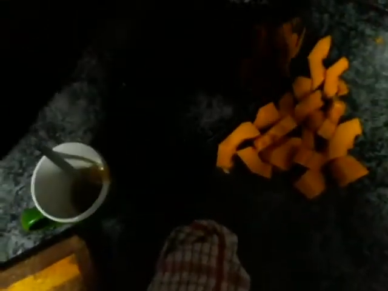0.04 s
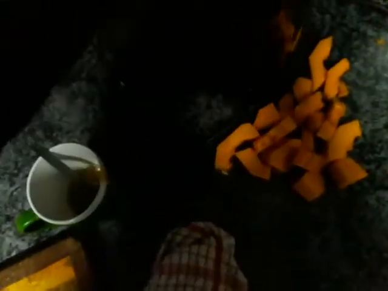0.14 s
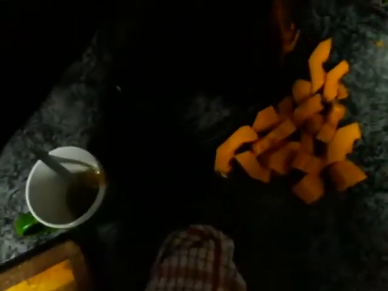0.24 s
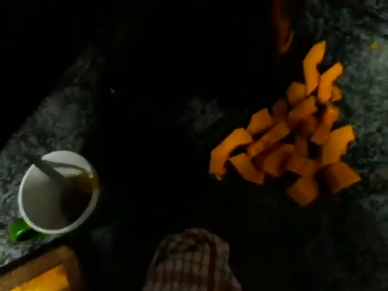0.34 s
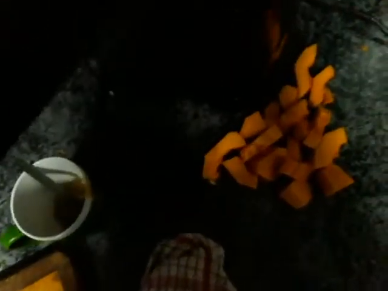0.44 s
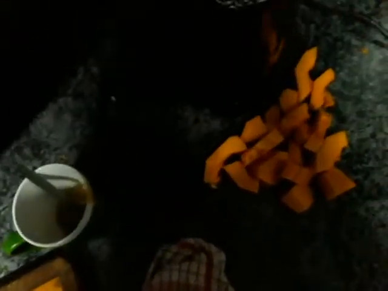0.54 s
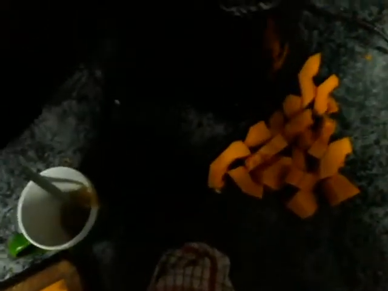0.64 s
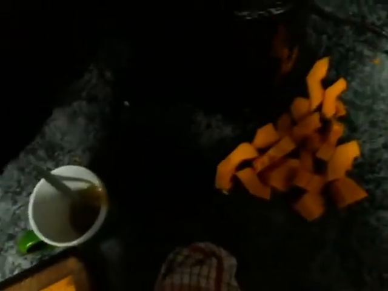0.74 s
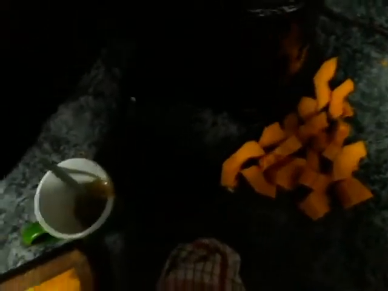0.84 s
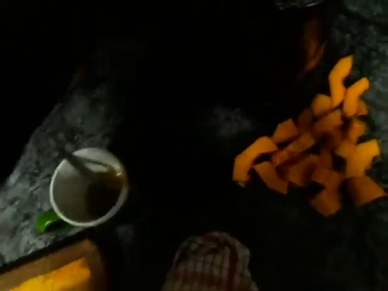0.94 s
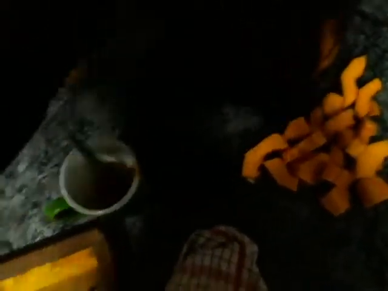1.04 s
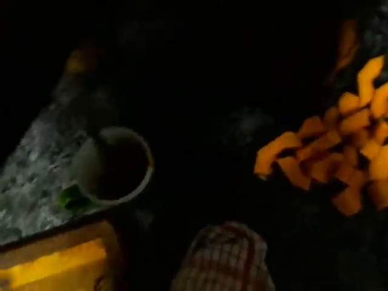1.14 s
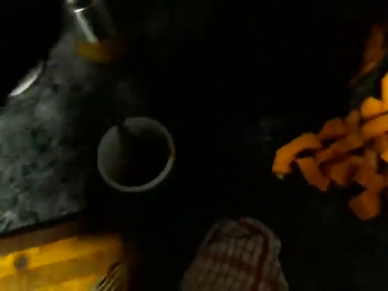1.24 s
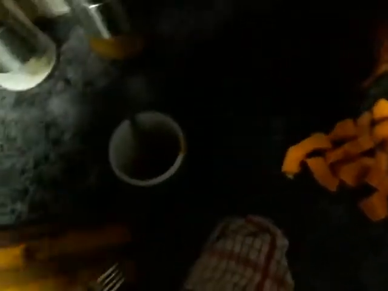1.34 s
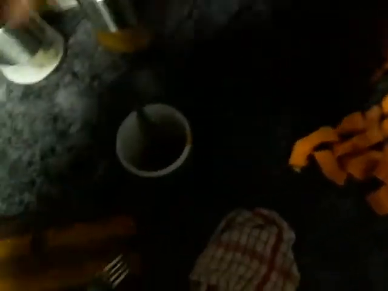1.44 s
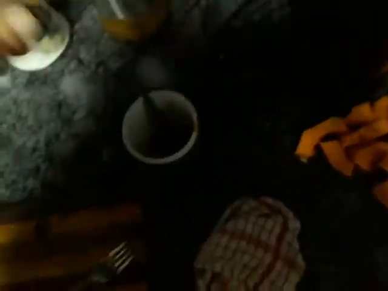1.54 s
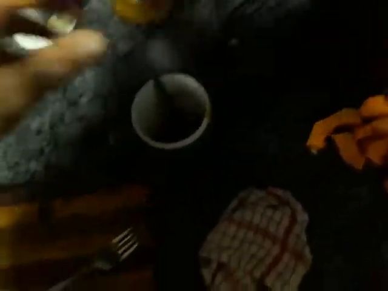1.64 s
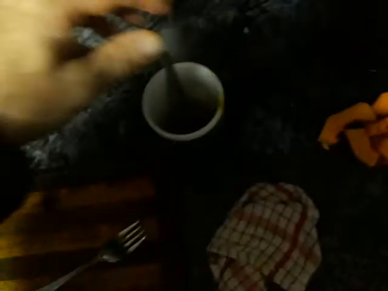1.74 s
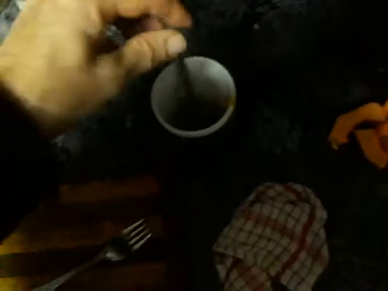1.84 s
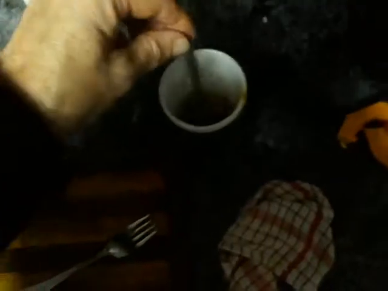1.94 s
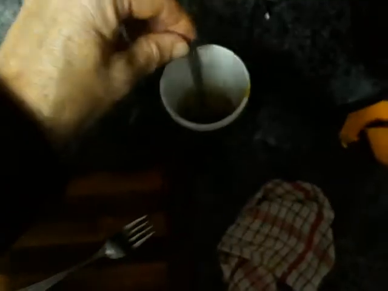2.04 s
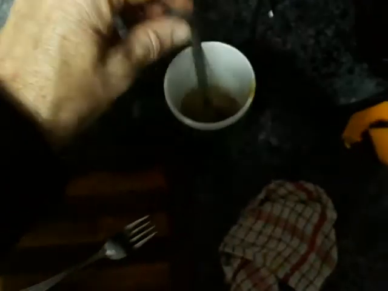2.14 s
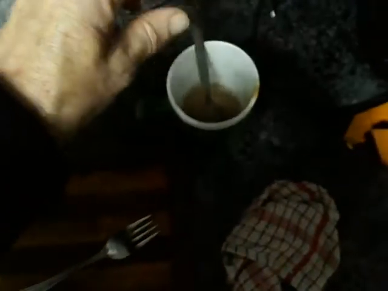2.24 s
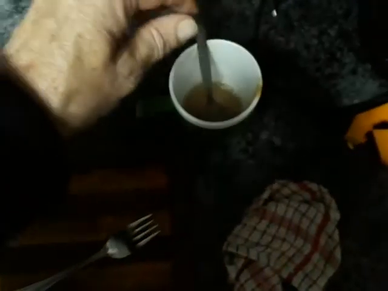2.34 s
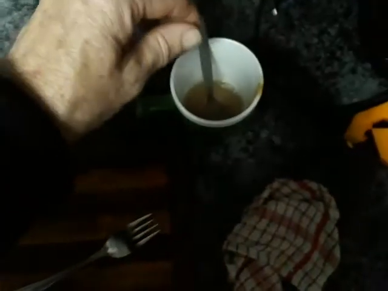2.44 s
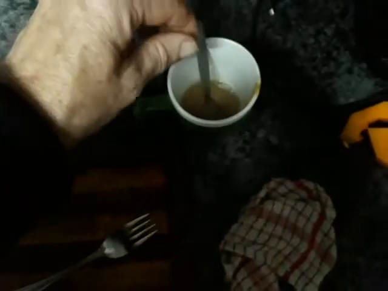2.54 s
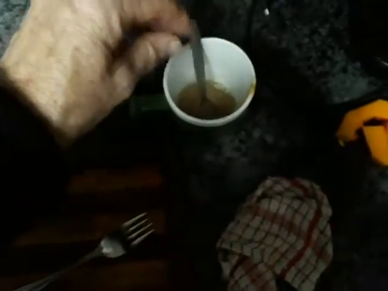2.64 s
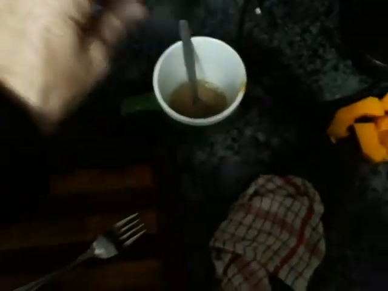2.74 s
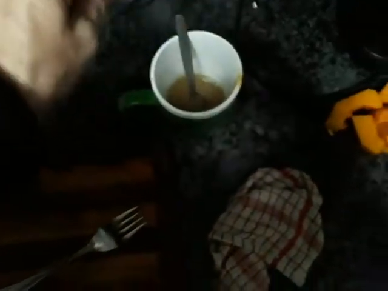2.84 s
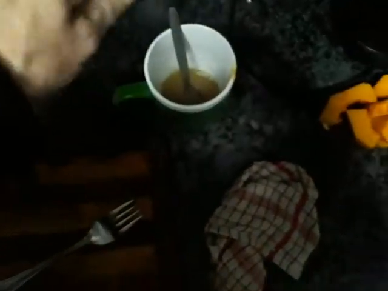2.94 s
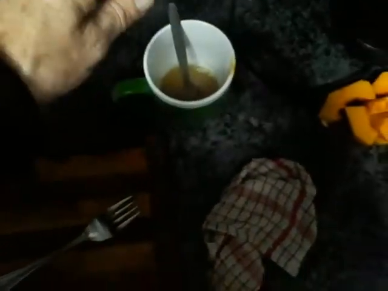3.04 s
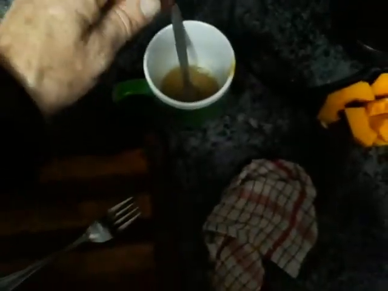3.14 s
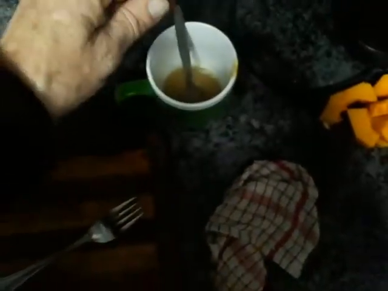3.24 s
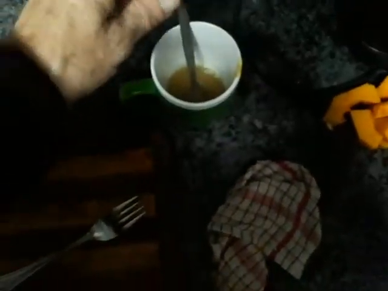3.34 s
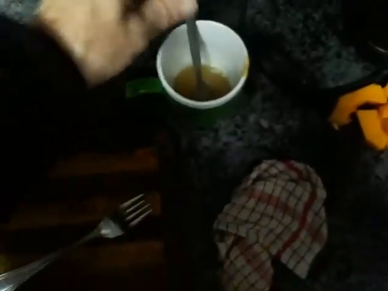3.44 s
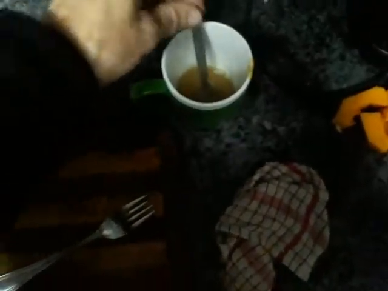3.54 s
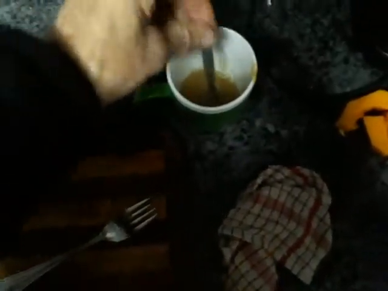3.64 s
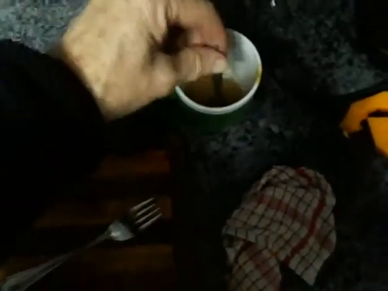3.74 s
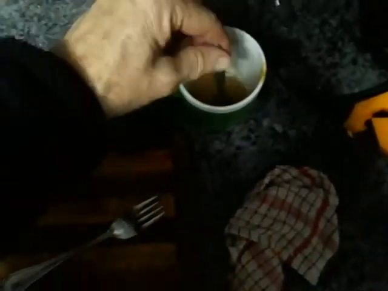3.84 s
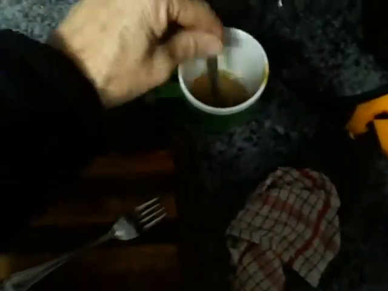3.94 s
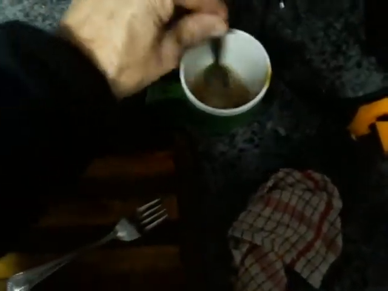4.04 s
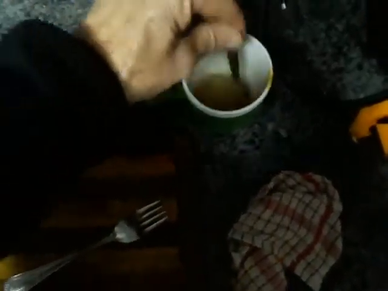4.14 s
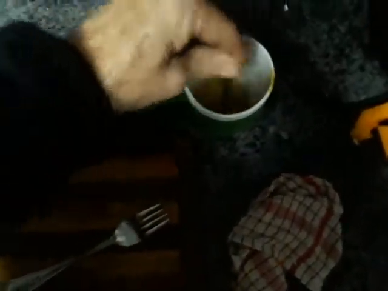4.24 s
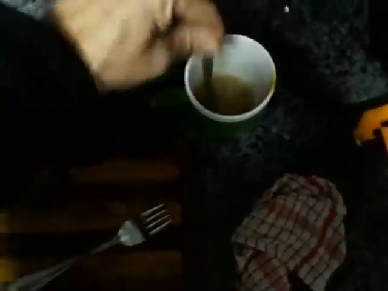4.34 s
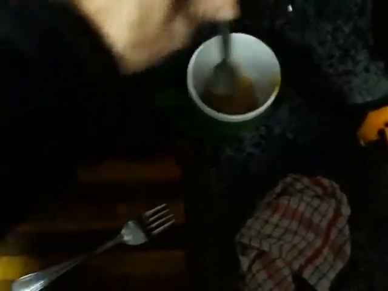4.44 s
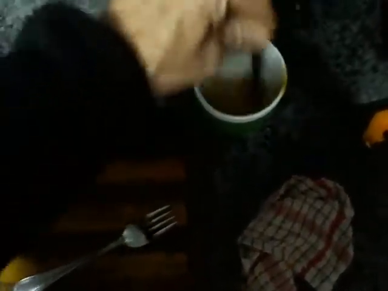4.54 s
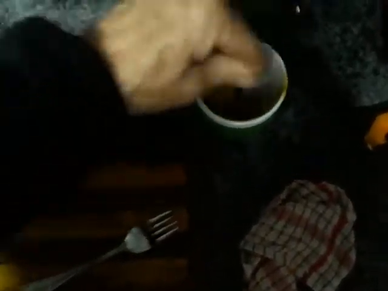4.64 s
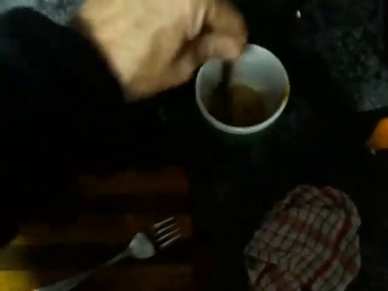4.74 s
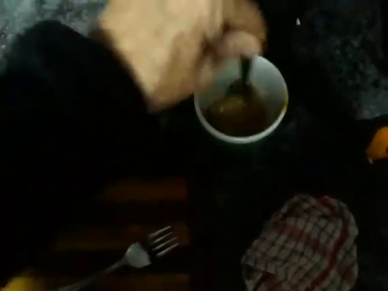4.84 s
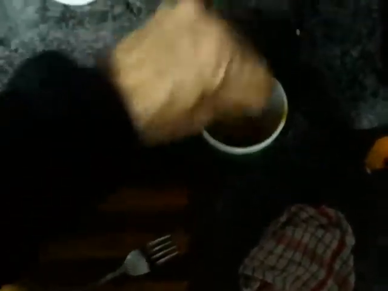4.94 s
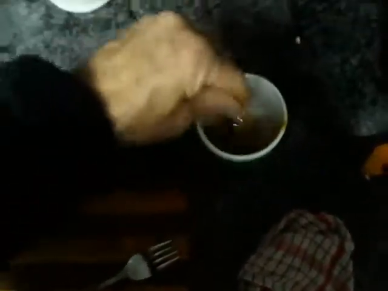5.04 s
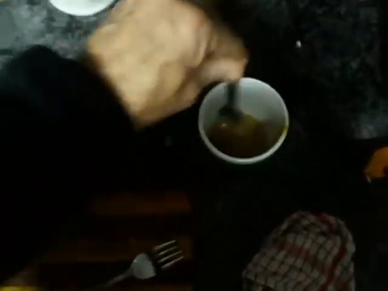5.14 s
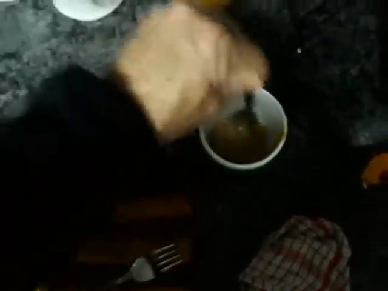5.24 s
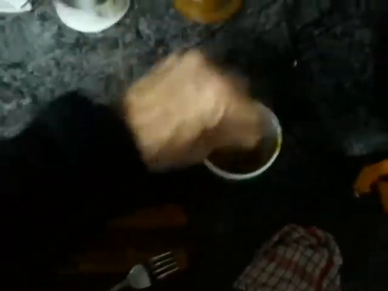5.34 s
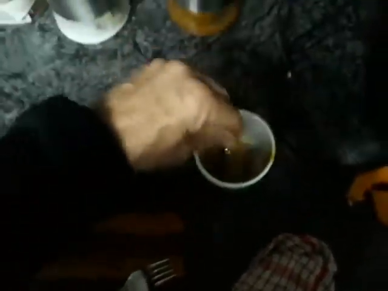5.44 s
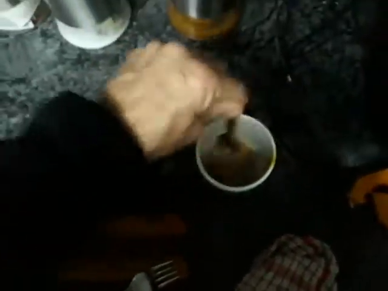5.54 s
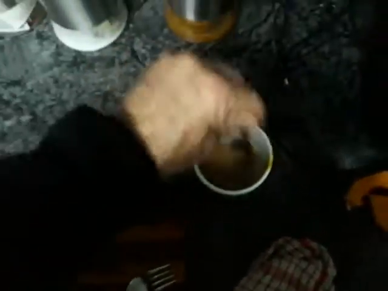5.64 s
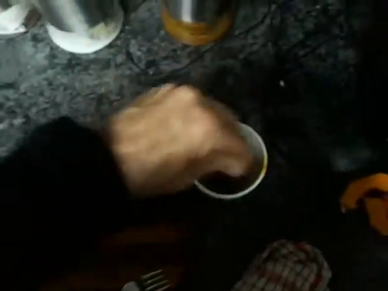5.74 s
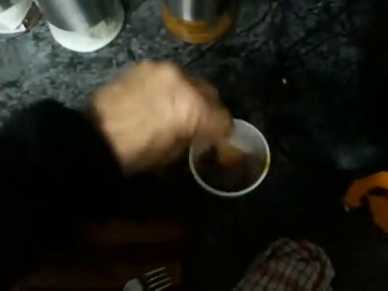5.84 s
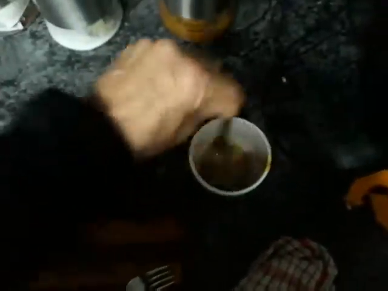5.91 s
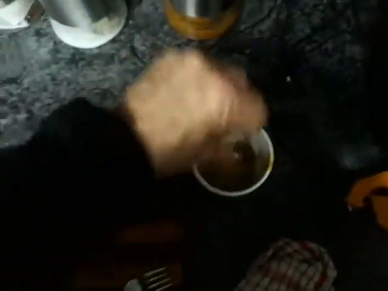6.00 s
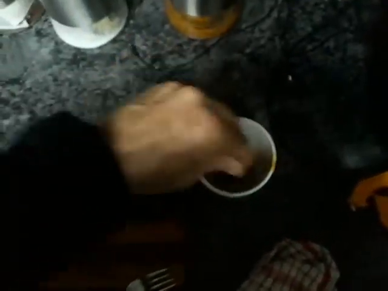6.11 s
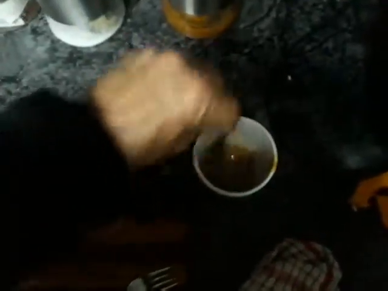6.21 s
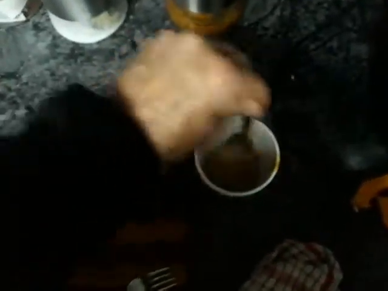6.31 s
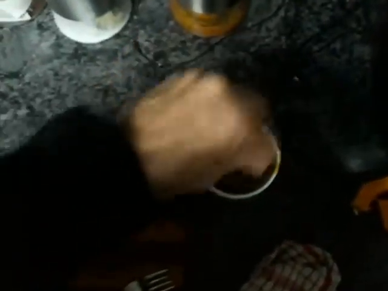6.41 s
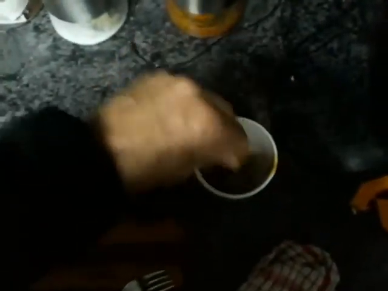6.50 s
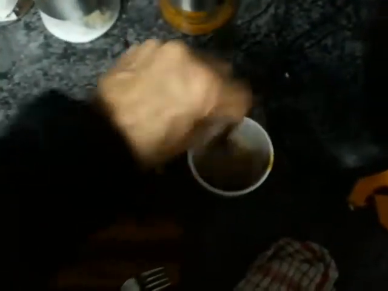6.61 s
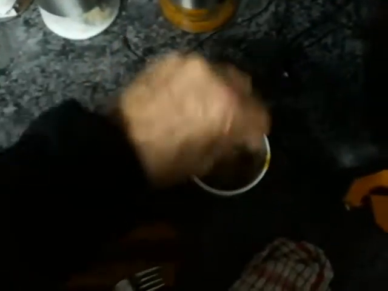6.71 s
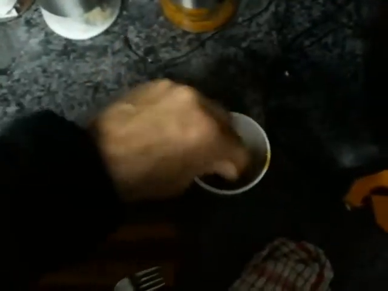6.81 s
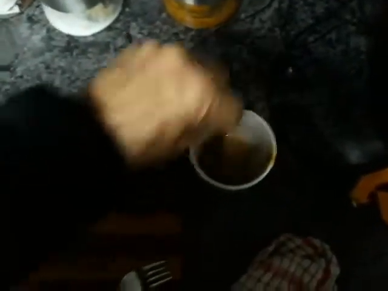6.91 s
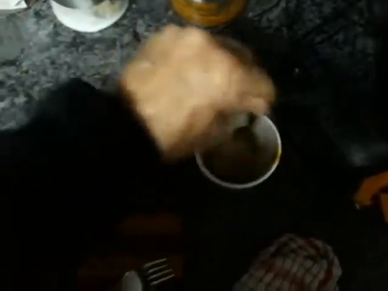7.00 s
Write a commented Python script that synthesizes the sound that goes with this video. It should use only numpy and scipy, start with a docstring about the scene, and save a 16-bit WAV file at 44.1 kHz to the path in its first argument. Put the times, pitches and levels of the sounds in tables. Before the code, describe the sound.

A close kitchen counter with a steady faint appliance hum and soft, slightly fluttering hiss. From 0 to 0.35 seconds, uneven wooden knocks and bumps, with a sharp catch snap at about 0.32; at 0.4 a loud, hollow cupboard or drawer slam, low thud and hard clack together, shudders in a fast weakening rattle and dies by about 0.9. Then near quiet, with barely audible sleeve rustles until 3.3, when a steel teaspoon falls against a ceramic mug: a quick bright clatter with short ringing, gone by 3.6. From about 4.2 to 7 seconds the spoon stirs briskly, one turn roughly every 0.38 seconds. Each turn has a gritty metallic scrape on the bottom, thin wall glides and irregular bright clinks; faint liquid swirling, occasional rising bubble blips and dull mug-foot bumps lie beneath. Short small-room reflections; stirring continues to the end.

```python
"""Kitchen counter, heard close: something wooden, likely a cupboard or drawer, knocks and bangs shut.
A steel teaspoon is let go in a ceramic mug, then stirs a drink: each turn clinks and scrapes.
An appliance hums under soft room hiss; a sleeve rustles faintly.
Blows are coloured noise bursts plus decaying modes; friction is random clicks through resonances.
Hum is wavering sines; hiss is noise fluttering in time-frequency patches."""
import sys
import numpy as np
from scipy import signal
from scipy.fft import rfft, irfft
from scipy.io import wavfile
from scipy.ndimage import uniform_filter1d, map_coordinates

SR = 44100
rng = np.random.default_rng(int(sys.argv[2]) if len(sys.argv) > 2 else 0)


def put_to_file(sound):
    """Save the sound as 16-bit audio at rate SR, in the file named by the first command-line argument."""
    columns = np.atleast_2d(sound).T  # one column per channel
    safe = np.clip(columns, -1, 1)
    whole_steps = np.round(safe * 32767)
    wavfile.write(sys.argv[1], SR, whole_steps.astype(np.int16))


N = 311610
RING_T_S = np.arange(SR * 3 // 4) / SR  # time axis of one ring
REFERENCE_DB = -20  # reference blow and tick
GRIP_S = 4.15  # fingers hold the spoon from here


def amp(db):
    """Decibels to gain."""
    return 10 ** (np.asarray(db) / 20)


def unit(x):
    """Scales to rms 1."""
    return x / np.sqrt(np.mean(x ** 2) + 1e-20)


def read(points, hz):
    """Joins (Hz, value) points on a log-frequency axis."""
    f, value = np.transpose(points)
    return np.interp(np.log(hz + 1), np.log(f), value)


def add(mix, s, sound):
    """Mixes a sound in at time s."""
    part = mix[max(round(s * SR), 0):][:len(sound)]
    part += sound[:len(part)]


def colour(x, points, tilt_db_per_oct=0):
    """Gives x a spectrum, tilted about 2 kHz (tilt flat below 200 Hz); rms 1."""
    hz = np.fft.rfftfreq(len(x), 1 / SR)
    octaves = np.log2(np.maximum(hz, 200) / 2000)
    gain = amp(read(points, hz) + tilt_db_per_oct * octaves)
    return unit(irfft(rfft(x) * gain, len(x)))


def resonate(x, hz, width_hz):
    """Steep-skirted resonance: one peak filter of this width, run twice; rms 1."""
    b, a = signal.iirpeak(min(hz, SR / 2 - 1), hz / width_hz, SR)
    once = signal.lfilter(b, a, x)
    return unit(signal.lfilter(b, a, once))


def highpass(x, hz):
    """Attenuates what lies below hz."""
    return signal.sosfilt(signal.butter(3, hz, "high", fs=SR, output="sos"), x)


def bend(x, speed):
    """Moves every resonance of x by the factor speed, moment by moment."""
    return map_coordinates(x, [np.cumsum(speed)], mode="wrap")


def dying(t60_s):
    """Envelope of a free decay."""
    return amp(-60 * RING_T_S / t60_s)


def mode(hz, db, t60_s):
    """One struck mode: a decaying sine."""
    return amp(db) * dying(t60_s) * np.sin(2 * np.pi * hz * RING_T_S)


def burst(x, t60_s, rise_s=0.00055):
    """Dense vibration builds up over the contact, then dies away from rms 1."""
    fade = dying(t60_s) * (1 - np.exp(-RING_T_S / rise_s))
    return x * fade / np.sqrt(np.sum((x * fade) ** 2) / np.sum(fade ** 2))


def noise():
    """White noise as long as one ring."""
    return rng.standard_normal(len(RING_T_S))


def slips(per_s, spread_db):
    """Stick and slip: tiny clicks at random times, of uneven size and either sign."""
    hits = rng.random(N) < per_s / SR
    return hits * amp(spread_db * rng.standard_normal(N)) * rng.choice([-1, 1], N)


# appliance hum lines: f/Hz, level/dB, wavering share
HUM_LINES = [(101.3, -58.5, 0.12), (150.7, -58, .35), (194, -64.5, 0.97), (343.3, -55.5, 0.55),
             (552, -59.5, 1.7)]
# room hiss spectrum: f/Hz, relative density/dB per Hz
HISS_SPECTRUM = [(20, -37), (45, -15), (72, -17), (95, -5.5), (160, -4.5), (215, -16), (335, 0),
                 (400, -6.5), (700, -8), (2300, -7.5), (3200, -17.5), (6200, -17), (10000, -42.5),
                 (16000, -33)]


def background(flutter_db=2.5, hum_width_hz=14, hiss_db=-47.5):
    """Hum lines wander as narrow noise joins each sine; hiss flutters in smoothed STFT patches."""
    t = np.arange(N) / SR
    hum = np.zeros(N)
    for hz, db, waver in HUM_LINES:
        wander = waver * resonate(rng.standard_normal(N), hz, hum_width_hz)
        hum += amp(db) * unit(np.sin(2 * np.pi * hz * t) + wander)
    z = signal.stft(rng.standard_normal(N), nperseg=256)[2]
    patch = np.outer(np.hanning(50), np.hanning(9))
    patches = unit(signal.fftconvolve(rng.standard_normal(z.shape), patch, "same"))
    hiss = signal.istft(z * amp(flutter_db * patches), nperseg=256)[1][:N]
    return hum + amp(hiss_db) * colour(hiss, HISS_SPECTRUM)


RATTLE_FROM_S, RATTLE_GAP_S, RATTLE_JITTER_S = 0.422, 0.014, 0.002
RATTLE_CLACK_DB, RATTLE_BODY_DB, RATTLE_FADE_DB_PER_S = -20, -16, 81


def rattle(count=6, bright_db_per_oct=1.5):
    """Quick, weakening knocks as the door shudders in its frame after the slam."""
    after = np.arange(count) * RATTLE_GAP_S + RATTLE_JITTER_S * rng.standard_normal(count)
    knocks = []
    for t in after:
        fade_db = RATTLE_FADE_DB_PER_S * t
        knocks.append((RATTLE_FROM_S + t, RATTLE_CLACK_DB - fade_db, RATTLE_BODY_DB - fade_db,
                       bright_db_per_oct))
    return knocks


# wooden knocks: t/s, clack level/dB, body level/dB, clack brightness/dB per octave
WOOD_KNOCKS = [(.015, -22, -17, -2), (.07, -39, -31, -2), (0.126, -30.5, -28, -2.5),
               (0.1857, -22, -22.5, -7), (0.2009, -36.5, -47, -1), (.246, -31.5, -30.5, -3),
               (0.322, -25, -33.5, 4), (0.366, -27.5, -21.5, -3), (0.3812, -18, -13.5, 2.5),
               (.3989, -9.5, -14, -3), (0.4073, -11.5, -12.5, 1.5), (.413, -15, -13.5, 1.5),
               (0.479, -18, -18, -4.5)]
# slam shakes the whole cabinet: t/s, level/dB
CABINET_SLAMS = [(0.403, -18.5), (0.479, -35)]
# catch snaps: t/s, level/dB
CATCH_SNAPS = [(0.3216, -3)]
# spectra of contact, boards, slam and catch: f/Hz, relative density/dB per Hz
CLACK_SPECTRUM = [(200, -35), (600, -27), (1200, -1), (1750, 0.5), (2400, 6.5), (3300, -8), (5000, -8),
                  (7000, -16.5), (9500, -40), (15000, -34)]
BOARD_SPECTRUM = [(40, -55), (80, -33), (120, -21), (200, -14), (270, 8.5), (330, 2.5), (410, -2),
                  (520, -12), (900, -10.5), (3000, -55)]
THUD_SPECTRUM = [(25, -25), (45, -25), (65, -2), (85, -10), (112, 7), (160, 11), (220, -22), (800, -57)]
SNAP_SPECTRUM = [(200, -18), (700, -11), (1200, -7), (2000, -2), (2550, 7), (3300, -4), (4300, -8),
                 (5300, -4), (7200, -8), (9500, -24), (15000, -22)]
# hollow of the cabinet, modes: f/Hz, level/dB before hollow_db, t60/s
CABINET_MODES = [(115.7, -12, 0.4), (160.6, -4, 0.19), (273, -29, 0.11), (411, -10.5, 0.2)]


def cupboard(clack_t60_s=0.095, board_t60_s=0.12, snap_t60_s=0.0076, hollow_db=-3, thud_t60_s=0.25,
             boards_lowest_hz=105):
    """Wooden blows: contact clack, thud of the boards, boom of the hollow behind them."""
    out = np.zeros(N)
    hollow = amp(hollow_db) * sum(mode(*row) for row in CABINET_MODES)
    body_swell = 1 - dying(0.034)
    for s, clack_db, body_db, bright in WOOD_KNOCKS + rattle():
        clack = burst(colour(noise(), CLACK_SPECTRUM, bright), clack_t60_s, rise_s=0.00013)
        body = burst(colour(noise(), BOARD_SPECTRUM), board_t60_s) + hollow
        add(out, s, amp(clack_db) * clack + amp(body_db) * body * body_swell)
    out = highpass(out, boards_lowest_hz)  # only the slam moves the whole cabinet
    for s, db in CABINET_SLAMS:
        add(out, s, amp(db) * burst(colour(noise(), THUD_SPECTRUM), thud_t60_s, rise_s=0.01))
    for s, db in CATCH_SNAPS:
        add(out, s, amp(db) * burst(colour(noise(), SNAP_SPECTRUM), snap_t60_s))
    return out


# sleeve rustles: t/s, level/dB, f/Hz
SLEEVE_RUSTLES = [(.07, -43.5, 4270), (.293, -50, 2300), (.835, -52.5, 5600), (1.15, -53, 1490),
                  (1.63, -47.5, 2180), (1.89, -51, 4740), (2.04, -50, 2210), (3.1, -49.5, 1680),
                  (4.063, -52.5, 2190)]


def sleeve(width_hz=2200, half_s=0.053):
    """Cloth brushes softly as the arm moves: random clicks through broad resonances."""
    t, drive = np.arange(N) / SR, slips(per_s=3200, spread_db=6.0)
    out = np.zeros(N)
    for s, db, hz in SLEEVE_RUSTLES:
        stroke = np.exp(-((t - s) / half_s) ** 2)
        out += amp(db) * stroke * resonate(drive, hz, width_hz)
    return out


MIDDLE_DB, MIDDLE_DB_PER_DB = -20, 0.92  # at the reference blow; slope with blow
MIDDLE_APART_DB_PER_OCT, MIDDLE_HZ = 20.5, 4970  # loss as spoon pitch leaves MIDDLE_HZ
TOP_DB, TOP_DB_PER_DB = -31, 2.1  # at the reference tick; slope with tick


def family_levels(blow_db, tick_db, hz, main_db, twin_db, high_db):
    """Mug mode-family levels/dB: contact point sets three, blow (with pitch) and tick the others."""
    apart_octaves = abs(np.log2(hz / MIDDLE_HZ))
    middle_db = MIDDLE_DB + MIDDLE_DB_PER_DB * (blow_db - REFERENCE_DB)
    middle_db -= MIDDLE_APART_DB_PER_OCT * apart_octaves
    top_db = TOP_DB + TOP_DB_PER_DB * (tick_db - REFERENCE_DB)
    return main_db + twin_db, main_db, middle_db, main_db + high_db, top_db


# spoon hits the wall: t/s, blow level/dB and tick level/dB before common gains, spoon f/Hz,
# mug main ring level/dB, lower twin re main/dB, high ring re main/dB
WALL_HITS = [(3.2943, -15, -23.5, 3780, -30.5, 6.5, 9.5), (3.307, -16, -44, 2710, -31, 13.5, -15),
             (3.3155, -17, -33, 2660, -34, -9, 13), (3.3663, -31, -46, 2660, -42.5, 14.5, 8.5),
             (3.433, -38.5, -58, 2980, -66, -14, 0), (3.464, -38.5, -48, 2930, -60, 0, 0),
             (3.5345, -40.5, -60, 2690, -69.5, 0, 21), (4.113, -34.5, -47, 3140, -66, -2, 0),
             (4.2314, -18.5, -16.5, 2980, -16, -25, 0), (4.4093, -16.5, -19.5, 5110, -22, -3.5, -7),
             (4.4522, -17.5, -19, 5040, -23.5, -3.5, -29), (4.533, -14.5, -26, 4580, -27, 7, 7.5),
             (4.5944, -30.5, -27.5, 4680, -28.5, 4.5, -11), (4.618, -39, -30.5, 5340, -27.5, -24, -14),
             (4.6832, -39, -34, 2940, -40, -19, -24), (4.787, -29.5, -27, 3900, -32.5, -1.5, 1),
             (4.998, -12.5, -25, 4170, -23, -4.5, 1.5), (5.006, -22, -23.5, 4930, -16, -37, -35),
             (5.1553, -17, -23.5, 5340, -27, -4, -3), (5.219, -29, -25, 4570, -32.5, -14, -18),
             (5.2665, -18, -26, 3240, -30.5, 4, 4.5), (5.3512, -26.5, -27, 3150, -31.5, 3.5, 2),
             (5.377, -18.5, -28.5, 2770, -44, -1, -7), (5.55, -31.5, -32.5, 5130, -42, -5, 3),
             (5.701, -33, -35, 4700, -24, -10, -3.5), (5.9162, -34, -30, 4570, -34.5, -9, -3),
             (6.0463, -28.5, -30.5, 4450, -24, -9.5, 3.5), (6.1149, -32, -38, 4600, -30.5, -10, -8),
             (6.1551, -17, -29, 2530, -40.5, -22, 15), (6.2627, -23.5, -22.5, 4920, -32.5, -6, 3.5),
             (6.402, -36, -30.5, 3300, -25, -8, -3.5), (6.506, -39, -29, 2870, -31.5, -20, -30),
             (6.6303, -46, -30, 4150, -37, -10, -4), (6.7232, -27, -34, 2020, -31.5, 5, -2.5),
             (6.969, -24.5, -23, 2950, -21, -16.5, -11)]
# mug modes, bell modes split into twins by the handle: family, f/Hz, level in family/dB,
# t60/s (clinks scale it)
MUG_MODES = [(0, 2067, 0, .24), (1, 2229, 1, .27), (1, 2256, -12, .16), (2, 5070, -6, .13),
             (3, 6258, -9, .18), (1, 4005, -21, .2), (2, 5126, 0, .15), (3, 6154, 1.5, .15),
             (4, 8560, -3, .16), (4, 8650, -10, .09), (4, 9790, -21, .15), (4, 10390, -15, .14),
             (4, 11220, -17, .18), (4, 11620, -20, .12)]
# spoon modes while no fingers hold it: f/Hz, level/dB before free_db, t60/s
FREE_SPOON_MODES = [(2700, -22, .11), (3220, -33, 0.11), (3770, -16, .08), (5050, -12, 0.15),
                    (10540, -22, 0.071), (11300, -29, 0.12)]
# tick spectrum: f/Hz, relative density/dB per Hz
TICK_SPECTRUM = [(300, 7.5), (1500, -4), (4000, 9), (7200, 13.5), (9000, -4.5), (12000, -17.5), (15000, 4),
                 (17000, -55)]
# ticks dull as the spoon settles into the drink: t/s, tilt/dB per octave
TICK_DULLING = [(3.3, 7), (4.3, 2.5), (5.3, 0), (7.0, -0.5)]


def clinks(tick_t60_s=0.022, spoon_t60_s=0.019, spoon_width_hz=900, spoon_db=1, tick_gain_db=4,
           clatter_db=-7, clatter_t60_s=0.057, chatter_s=0.0018, free_db=-1, fizz_db=-13,
           fizz_t60_s=0.051, ping_db=0, ping_t60_s=0.039, drink_shortening=0.81, loss_per_db=0.016):
    """Hard tick, spoon ring choked by hand and liquid, mug bell modes picked by the contact point."""
    out = np.zeros(N)
    swell = 1 - np.exp(-RING_T_S / chatter_s)  # spoon chatters on the wall, so the ring builds up
    free = amp(free_db) * sum(mode(*row) for row in FREE_SPOON_MODES)
    for s, blow_db, tick_db, hz, *ring in WALL_HITS:
        families = family_levels(blow_db, tick_db, hz, *ring)
        # harder blows ring shorter
        length = drink_shortening * np.exp(-loss_per_db * (blow_db - REFERENCE_DB))
        tilt = np.interp(s, *np.transpose(TICK_DULLING))
        contact = burst(colour(noise(), TICK_SPECTRUM, tilt), tick_t60_s)
        contact += amp(fizz_db) * burst(colour(noise(), TICK_SPECTRUM, tilt), fizz_t60_s)
        steel = amp(spoon_db) * burst(resonate(noise(), hz, spoon_width_hz), spoon_t60_s, rise_s=0.0013)
        steel += amp(clatter_db) * burst(resonate(noise(), 3900, 2400), clatter_t60_s)
        steel += mode(hz, ping_db, ping_t60_s)  # clear ring at the spoon's pitch
        spoon = steel + free * (s < GRIP_S)
        bell = sum(mode(f, families[round(k)] + db, t60 * length) for k, f, db, t60 in MUG_MODES)
        add(out, s, amp(tick_db + tick_gain_db) * contact + amp(blow_db) * spoon + swell * bell)
    return out


# mug foot bumps the counter: t/s, level/dB before bump_db
FOOT_BUMPS = [(3.294, -32), (4.232, -31.5), (4.455, -32), (5.0, -34), (5.026, -34.5), (5.221, -34.5),
              (5.376, -29), (5.425, -32), (6.156, -33), (6.971, -44)]
# foot spectrum: f/Hz, relative density/dB per Hz
FOOT_SPECTRUM = [(60, -24), (200, -25), (350, -13.5), (550, 3.5), (800, -4.5), (1500, -17), (3000, -14),
                 (8000, -46)]
# bubbles in the drink: t/s, level/dB, starting f/Hz
DRINK_BUBBLES = [(4.514, -37, 1550), (4.666, -36, 1480), (4.68, -34, 1130), (5.806, -38.5, 1130),
                 (6.616, -38, 1640), (6.724, -32, 1420)]


def drink(bubble_t60_s=0.046, phase_climb_per_s=4, bump_t60_s=0.23, bump_db=-5):
    """Mug rocks on its foot in noise bursts; bubbles chirp upward as they close."""
    out = np.zeros(N)
    for s, db in FOOT_BUMPS:
        add(out, s, amp(bump_db + db) * burst(colour(noise(), FOOT_SPECTRUM), bump_t60_s))
    for s, db, hz in DRINK_BUBBLES:
        add(out, s, mode(hz * (1 + phase_climb_per_s * RING_T_S), db, bubble_t60_s))
    return out


# drive of each mug family by rubbing on the bottom: level/dB
RUBBED_FAMILIES = [-20, 0.5, -5.5, -8.5, -31]


def rubbed_mug(drive):
    """Mug modes ring under a friction drive; rms 1."""
    bell = sum(mode(f, db + RUBBED_FAMILIES[round(k)], t60) for k, f, db, t60 in MUG_MODES)
    return unit(signal.fftconvolve(drive, bell)[:len(drive)])


# spoon tip drags over the bottom, as it settles, then once a turn: t of hardest pressure/s,
# level/dB, rise/s, spoon f/Hz, level offset of the glides that follow/dB
BOTTOM_SCRAPES = [(3.318, -20, 0.0045, 2730, -40), (4.257, -19, 0.0091, 2690, 3.5),
                  (4.651, -22, 0.0048, 2766, -3), (5.032, -22, 0.013, 2740, 0),
                  (5.427, -22, 0.017, 2820, -0.5), (5.794, -18.5, 0.0064, 2840, 0.5),
                  (6.156, -18.5, 0.0072, 2755, 1), (6.508, -16, 0.0086, 2806, 1.5),
                  (6.851, -19, 0.016, 2837, 1)]
# pressed spoon modes: multiple of its f, width/Hz per filter pass, level/dB
PRESSED_SPOON_MODES = [(0.998, 250, -0.5), (1.391, 350, -13.5), (1.78, 400, -11), (2.15, 700, -14.5),
                       (2.7, 900, -36.5)]


def scrapes(mug_db=-10, grit_db=-22, stiffening=0.082, fall_s=0.01):
    """Pressure swells and lets go; slips drive the mug and the spoon, whose modes rise when pressed."""
    out, t = np.zeros(N), RING_T_S - RING_T_S[-1] / 2
    for s, db, rise_s, hz, _ in BOTTOM_SCRAPES:
        pressure = np.exp(np.minimum(t / rise_s, -t / fall_s))
        drive = slips(per_s=2100, spread_db=4.5)[:len(t)]
        speed = 1 + stiffening * (pressure - 0.5)
        steel = 0
        for ratio, width_hz, level_db in PRESSED_SPOON_MODES:
            pressed = pressure * bend(resonate(drive, hz * ratio, width_hz), speed)
            steel = steel + amp(level_db) * unit(pressed)
        grit = amp(grit_db) * unit(pressure * colour(drive, TICK_SPECTRUM))
        ring = amp(mug_db) * rubbed_mug(drive * pressure)
        strength = amp(db) * np.sqrt(np.mean(pressure ** 2))
        add(out, s + t[0], strength * (steel + grit + ring))
    return out


# two glides along the wet wall per turn, first dull, then bright: t after scrape/s,
# level/dB before offsets, half length/s, level of upper modes/dB
WALL_GLIDES = [(0.084, -36.5, 0.016, -14), (0.17, -40, .042, -0.5)]


def turn_glides(vary_db=1, vary_pitch=0.015):
    """The same two glides follow each scrape, randomly varied in level and pitch."""
    events = []
    for s, *_, turn_db in BOTTOM_SCRAPES:
        for after, db, half_s, bright_db in WALL_GLIDES:
            level_db = db + turn_db + vary_db * rng.standard_normal()
            pitch = 1 + vary_pitch * rng.standard_normal()
            events.append((s + after, level_db, half_s, bright_db, pitch))
    return events


# gliding spoon modes, first always sounding: f/Hz before bending, width/Hz per filter pass, level/dB
GLIDING_SPOON_MODES = [(4810, 310, -3.5), (2860, 700, 2), (4140, 35, -1), (5330, 170, -1), (7600, 580, -8),
                       (14900, 1500, -18)]


def glides(level_db=-4, mug_db=-17, judder_db=2, arc=0.046, wander=0.0147):
    """Light juddering friction: spoon modes arch in pitch over the stroke, the mug sings faintly."""
    out, t = np.zeros(N), RING_T_S - RING_T_S[-1] / 2
    for s, db, half_s, bright_db, pitch in turn_glides():
        drive = slips(per_s=900, spread_db=2)[:len(t)]
        stroke = np.exp(-(t / half_s) ** 2)
        modes = [amp(level) * resonate(drive, hz, width) for hz, width, level in GLIDING_SPOON_MODES]
        main, *upper = modes
        drift = unit(uniform_filter1d(uniform_filter1d(noise(), size=600), size=600))
        speed = pitch + arc * (stroke - 0.8) + wander * drift
        steel = bend(main + amp(bright_db) * sum(upper), speed)
        force = stroke * amp(judder_db * unit(uniform_filter1d(noise(), size=400)))
        ring = amp(mug_db) * np.sqrt(np.mean(force ** 2)) * rubbed_mug(force * drive)
        add(out, s + t[0], amp(db + level_db) * (force * steel + ring))
    return out


def swirl(after_s=0.18, half_s=0.12, level_db=-49.5, hz=2040, width_hz=1200):
    """Drink swirls behind the held spoon: a crackle of tiny bubbles swells after each scrape."""
    t = np.arange(N) / SR
    turns_s = [s for s, *_ in BOTTOM_SCRAPES if s > GRIP_S]
    swell = sum(np.exp(-((t - s - after_s) / half_s) ** 2) for s in turns_s)
    return amp(level_db) * swell * resonate(slips(per_s=1500, spread_db=3), hz, width_hz)


# kitchen reverberation: f/Hz, t60/s
ROOM_DECAY = [(120, 0.43), (500, 0.36), (2500, 0.29), (6000, 0.29), (15000, 0.19)]


def kitchen(x):
    """Dense reflections from counter and walls: noise tail, each band dying at its own speed."""
    hz, t, z = signal.stft(noise(), SR, nperseg=256)
    decay = amp(-60 * t / read(ROOM_DECAY, hz)[:, None])
    tail = signal.istft(z * decay, SR, nperseg=256)[1][:len(RING_T_S)]
    tail = tail * (1 - dying(0.0033))
    return signal.fftconvolve(x, tail / np.linalg.norm(tail))[:N]


def scene(mug_room_db=-10, wood_room_db=-12, mug_lowest_hz=170):
    """Near mug, too small to radiate bass, and cupboard share one small room."""
    wood = cupboard()
    mug = highpass(clinks() + drink() + scrapes() + glides() + swirl(), mug_lowest_hz)
    room = kitchen(amp(mug_room_db) * mug + amp(wood_room_db) * wood)
    return (background() + wood + sleeve() + mug + room)[None]


def record(dry, low_cut_hz=40, edge_hz=16100):
    """Loudest peaks round off; the small microphone drops deep bass; then the band limit."""
    rounded = dry / (1 + dry ** 4) ** (1 / 4)
    band = signal.firwin(255, edge_hz, window=("kaiser", 9), fs=SR)[None]
    return signal.oaconvolve(highpass(rounded, low_cut_hz), band, "same")


dry = scene()
out = record(dry)
put_to_file(out)
```